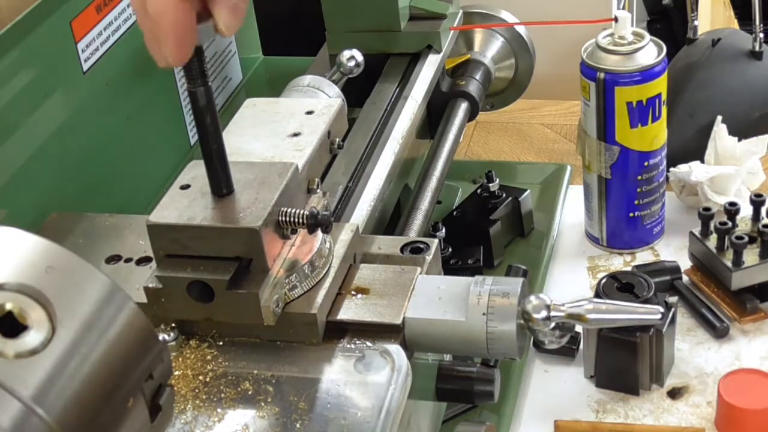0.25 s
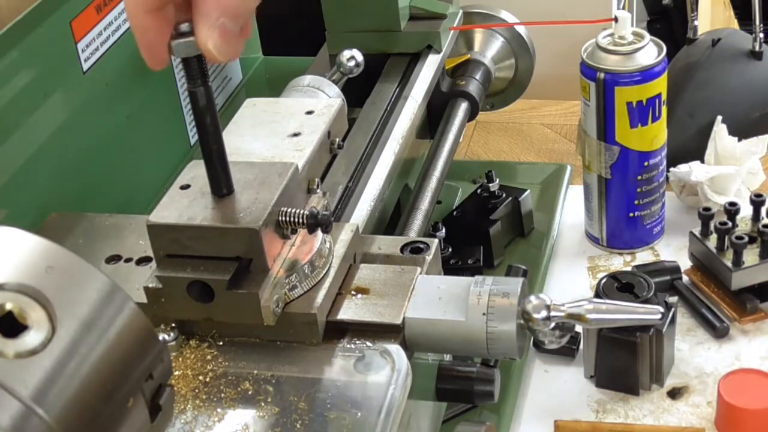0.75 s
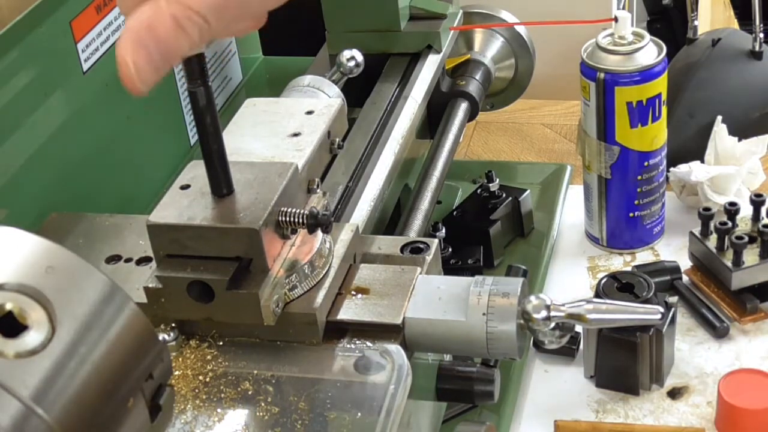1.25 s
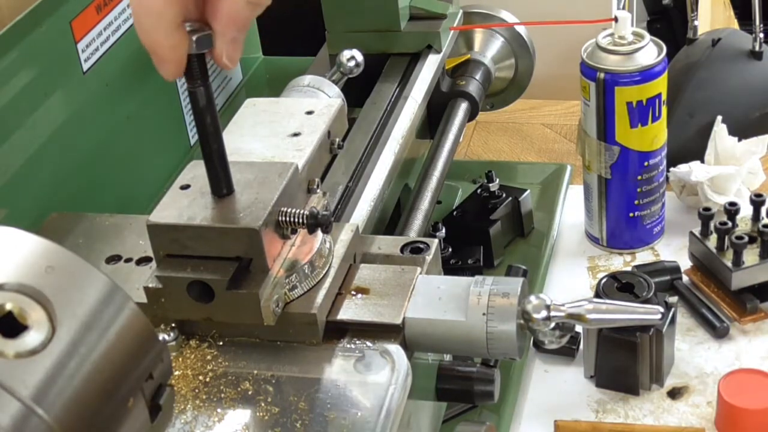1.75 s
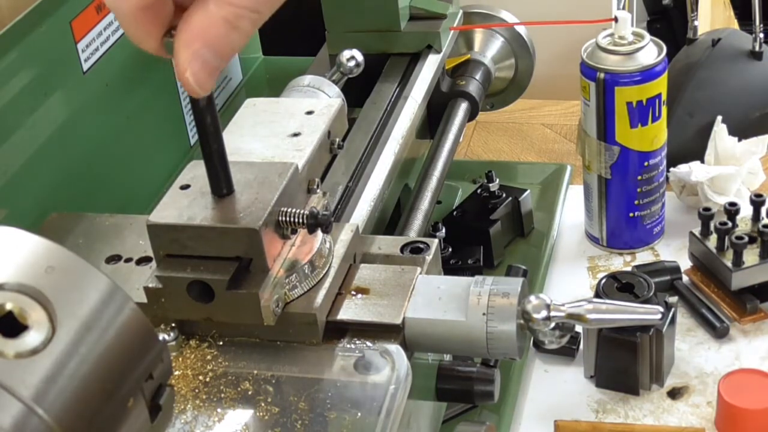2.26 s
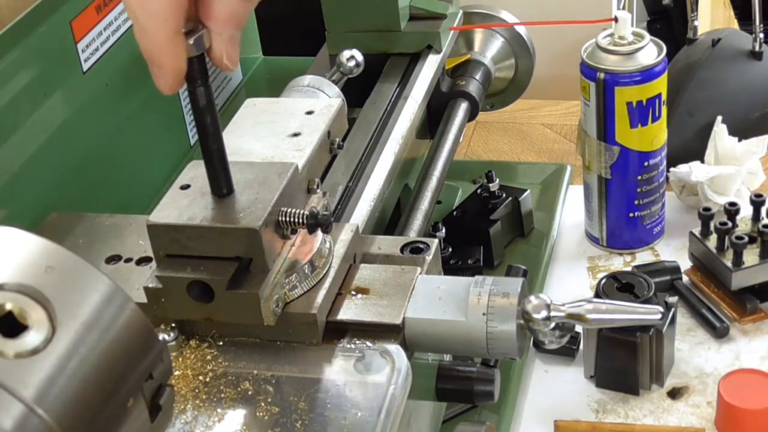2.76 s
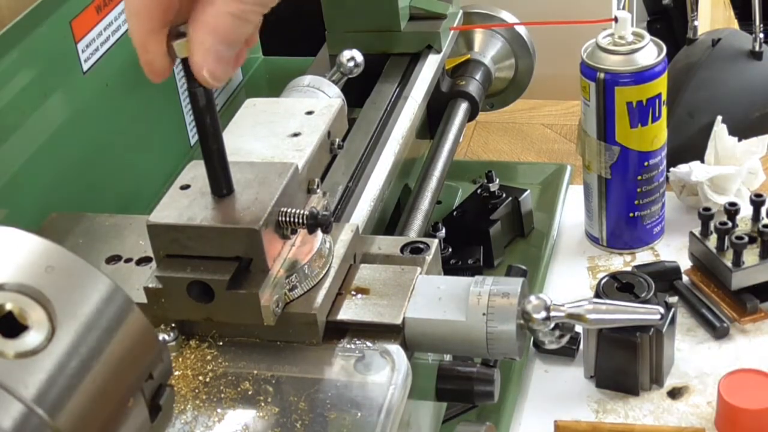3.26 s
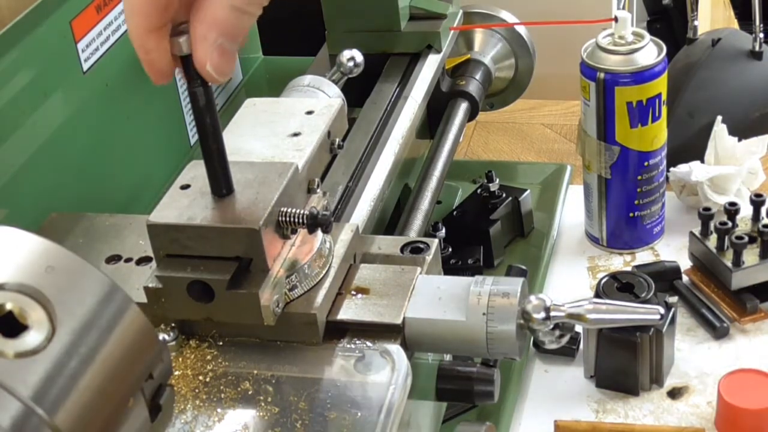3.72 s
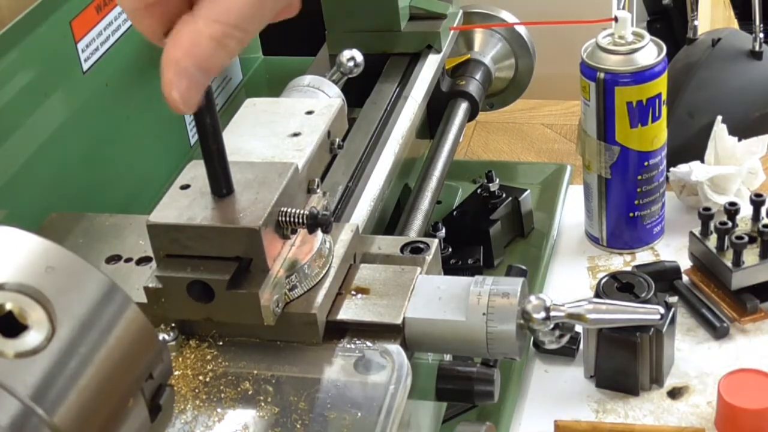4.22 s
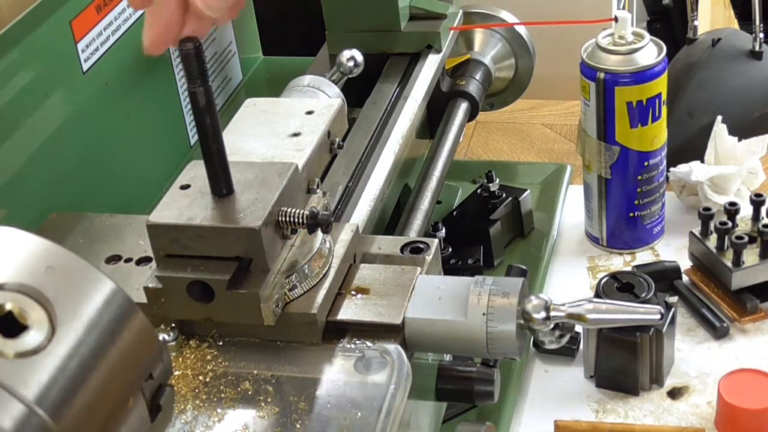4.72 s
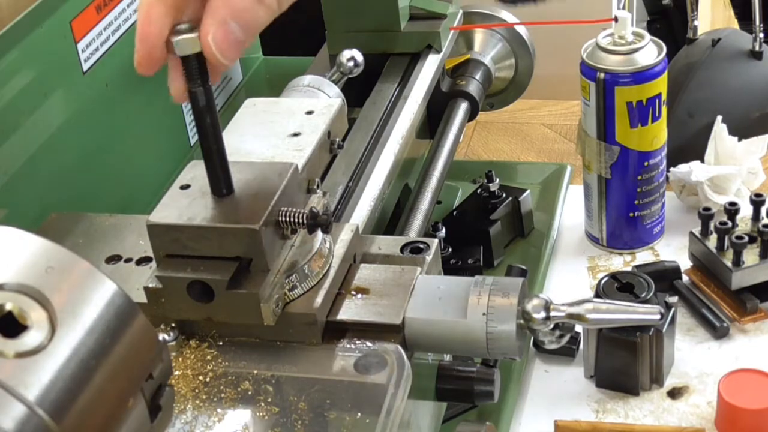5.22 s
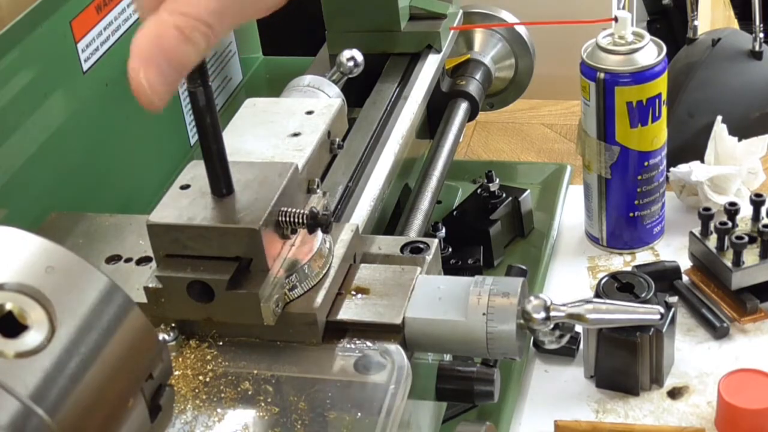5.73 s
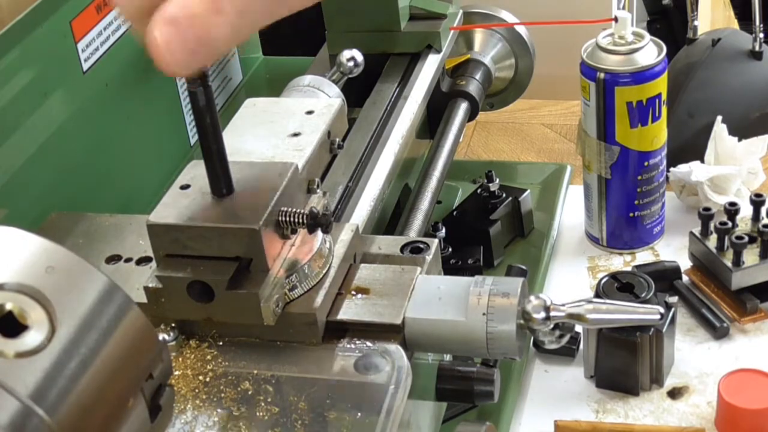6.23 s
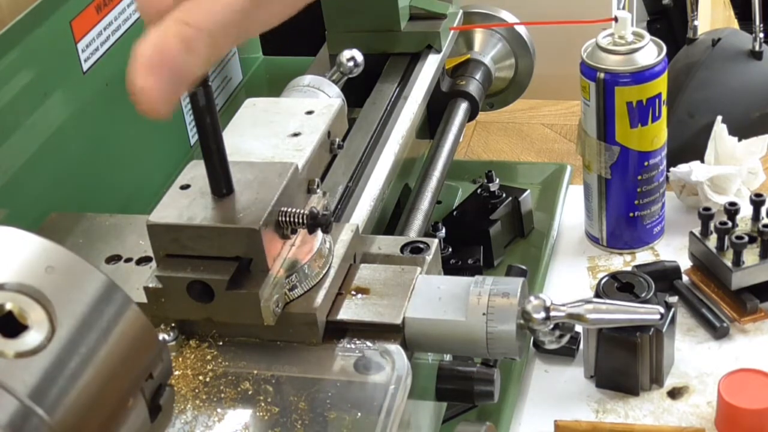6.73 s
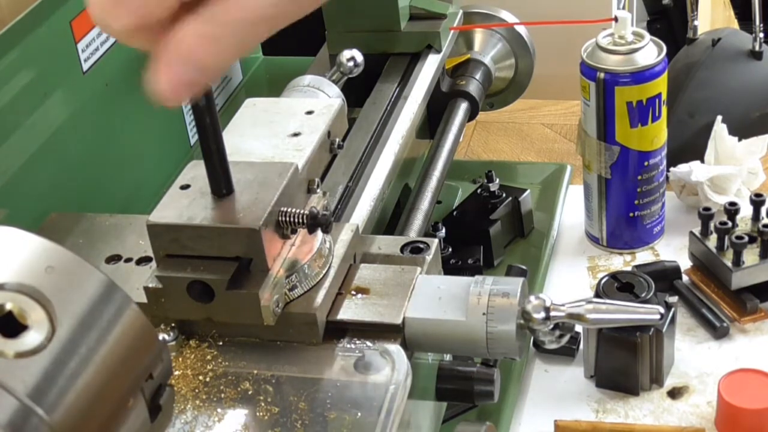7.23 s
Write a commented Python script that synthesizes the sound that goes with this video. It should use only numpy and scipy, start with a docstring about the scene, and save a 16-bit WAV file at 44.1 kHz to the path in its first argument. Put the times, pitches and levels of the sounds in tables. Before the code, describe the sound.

A steel nut is started by hand on a threaded stud in a heavy machine slide. A sharp bright click opens, followed by short dull grinding twists, small thread knocks and sparse ticks. Fingers brush softly and bump the work in the middle. A tight cluster of clicks comes near five seconds, then longer, grittier turns. Close stereo microphone, small workshop, short tail, faint low air and hiss.

```python
"""Nut started by hand on a lathe stud

A steel nut is started on a threaded stud in the slide of a small lathe, in a home workshop.
Its clicks on the stud are short noise bursts through steel resonances. Its short grinding turns are random
grains through the dull modes of the slide, with catches and slips of the thread as single struck knocks.
Fingers swish as coloured noise, soft thumps swing the bench resonances, the hand stirs a low murmur,
the bed hums on once as decaying sines, and the room hisses faintly as steady noise."""
import sys
import numpy as np
from scipy import signal
from scipy.fft import rfft, irfft, next_fast_len
from scipy.io import wavfile
from scipy.ndimage import uniform_filter1d

SR = 44100
rng = np.random.default_rng(int(sys.argv[2]) if len(sys.argv) > 2 else 0)


def output_pcm(signal):
    """Save a mono or channel-first signal as 16-bit PCM at the path in sys.argv[1].

    Samples are clipped to [-1, 1] before scaling.
    """
    pcm = np.clip(np.atleast_2d(signal).T, -1, 1) * 32767
    wavfile.write(sys.argv[1], SR, np.round(pcm).astype(np.int16))


N = 329868
TIME = np.arange(N) / SR


def from_db(db):
    """Decibels to gain."""
    return 10 ** (np.asarray(db) / 20)


def rms_one(x):
    """Scale to rms 1."""
    return x / np.sqrt(np.mean(x ** 2) + 1e-20)


def at_hz(points, hz):
    """Interpolate a table on a log-frequency axis."""
    table_hz, value = np.transpose(points)
    return np.interp(np.log(hz + 1), np.log(table_hz), value)


def colour(x, spectrum):
    """Give a steady noise a spectrum; rms 1."""
    size = next_fast_len(N)
    gain = from_db(at_hz(spectrum, np.fft.rfftfreq(size, 1 / SR)))
    return rms_one(irfft(rfft(x, size) * gain, size)[..., :N])


def soften(x, hz):
    """A contact of finite length holds little above a corner frequency."""
    return signal.sosfilt(signal.butter(4, hz, fs=SR, output="sos"), x)


def thin(x, hz):
    """Reduce the bass below a corner frequency."""
    return signal.sosfilt(signal.butter(2, hz, "high", fs=SR, output="sos"), x)


def resonate(x, hz, width_hz):
    """One two-pole resonance, gain about 1 on top."""
    r = np.exp(-np.pi * width_hz / SR)
    numerator = np.array([1, 0, -1]) * (1 - r * r) / 2
    denominator = [1, -2 * r * np.cos(2 * np.pi * hz / SR), r * r]
    return signal.lfilter(numerator, denominator, x + 1e-18)


def body(x, modes):
    """Resonances in parallel, alternating in sign."""
    return sum((-1) ** k * from_db(db) * resonate(x, hz, width_hz)
               for k, (hz, width_hz, db) in enumerate(modes))


def pan(x, left_right_db):
    """Place a sound by its left minus right level."""
    return x * from_db(np.array([[left_right_db], [-left_right_db]]) / 2)


def add(track, start_s, sound):
    """Mix a sound in at a time."""
    i = int(start_s * SR)
    track[..., i:i + sound.shape[-1]] += sound[..., :N - i]


def contact(decay_s):
    """A touch is a quickly fading burst of tiny collisions."""
    t = TIME[:SR // 5]
    return rng.choice([-1, 1], len(t)) * np.exp(-t / decay_s)


def grains(per_s, spread_db):
    """Rough spots catch at random, with uneven force; rms 1."""
    sizes = from_db(spread_db * np.minimum(rng.exponential(1, N), 4))
    return rms_one(sizes * rng.choice([-1, 1], N) * (rng.random(N) < per_s / SR))


# Fingers turn the nut. Each row: start in seconds, length in seconds, relative grinding level in dB,
# grinding centre at top speed in Hz, relative rasp level at top speed in dB.
TURNS = [(0.308, 0.073, -48.5, 780, -59.5), (0.415, 0.037, -45.5, 790, -66),
         (0.492, 0.031, -42, 660, -49.5), (0.619, 0.015, -45.5, 790, -62),
         (0.892, 0.016, -44.5, 770, -59.5), (1.046, 0.04, -56, 740, -75), (1.111, 0.051, -48.5, 700, -66),
         (1.606, 0.027, -53.5, 696, -64), (1.625, 0.054, -48, 734, -71.5),
         (1.713, 0.087, -55.5, 684, -70.5), (1.938, 0.059, -45.5, 696, -59.5),
         (2.041, 0.095, -55.5, 830, -69), (2.436, 0.041, -50, 810, -61.5), (2.505, 0.031, -53, 930, -52.5),
         (2.829, 0.051, -58.5, 1000, -57.5), (3.352, 0.019, -47, 650, -66.5),
         (3.646, 0.014, -50.5, 756, -63), (4.39, 0.11, -56, 700, -70.5), (4.505, 0.031, -42, 790, -55.5),
         (5.027, 0.099, -41.5, 830, -53), (5.511, 0.15, -56, 674, -68), (5.665, 0.11, -54.5, 720, -67),
         (6.012, 0.089, -51.5, 666, -64.5), (6.106, 0.12, -47.5, 750, -57.5), (6.38, .13, -48.5, 780, -57),
         (6.682, 0.098, -48, 770, -57.5), (6.948, 0.042, -56, 764, -63.5), (7.001, 0.056, -49.5, 820, -56),
         (7.242, 0.11, -48.5, 770, -58.5)]
GRIP_S, RELEASE_DB_PER_S = 0.0039, 444
START_SPEED = 0.33   # share of top speed at the start and end of a turn
GRIND_SPEED_DB, RASP_SPEED_DB, SPEED_OCTAVES = 4, 8.5, 0.17   # rise from standstill to top speed
CREEP_HZ = 700


def turning():
    """A turn grips, speeds up, slows, lets go; speed lifts the rasp strongly, the grinding and its pitch a little."""
    grind, rasp, pitch_sum = np.zeros(N), np.zeros(N), np.zeros(N)
    t = TIME[:SR // 2]
    for start_s, length_s, grind_db, hz, rasp_db in TURNS:
        release = from_db(-RELEASE_DB_PER_S * np.maximum(t - length_s, 0))
        grip = np.minimum(t / GRIP_S, 1) * release
        speed = START_SPEED + (1 - START_SPEED) * np.sin(np.pi * np.minimum(t / length_s, 1))
        gain = grip * from_db(grind_db + GRIND_SPEED_DB * (speed - 1.5))
        add(grind, start_s, gain)
        add(pitch_sum, start_s, gain * hz * 2 ** (SPEED_OCTAVES * (speed - 1)))
        add(rasp, start_s, grip * from_db(rasp_db + RASP_SPEED_DB * (speed - 1)))
    centre_hz = (pitch_sum + 1e-12 * CREEP_HZ) / (grind + 1e-12)   # gain-weighted where turns overlap
    return grind, centre_hz, rasp


# Modes of slide and tool block. Each row: frequency in Hz, width in Hz, relative level in dB.
SLIDE = [(209,18,-6.5),(304,60,-11.5),(427,54,-5),(526.3,15.3,0),(583,31.4,-2.5),(680.2,15.2,2.5),(750,85,-5),(840,82,-2),(963,40,-16),(989,18,1.5),(1000,160,-8.5),(1156,68,-4.5),(1260,156,-14.5),(1513.4,58,-8.5),(2084,106,-14.5),(2330,600,-24.5)]


def slide(force, centre_hz, focus_db):
    """The slide rings in all its modes; the grip favours those near a centre frequency."""
    out = 0
    for k, (hz, width_hz, db) in enumerate(SLIDE):
        near = 1 / (1 + (np.log2(hz / centre_hz) / 0.34) ** 2)
        out = out + (-1) ** k * from_db(db + focus_db * near) * resonate(force, hz, width_hz)
    return out


def grinding(gain, centre_hz):
    """Thread flanks rub and shake the slide, whose swell lags the force slightly."""
    ringing = slide(grains(per_s=900, spread_db=3.0), centre_hz, focus_db=12.5)
    ringing /= np.sqrt(uniform_filter1d(ringing ** 2, size=1100) + 1e-12)   # steady finger pressure
    r = np.exp(-1 / (0.00043 * SR))
    return from_db(1.0) * signal.lfilter([1 - r], [1, -r], gain) * ringing


def stick_slip(depth_db, grip_s):
    """The thread grips and frees itself, so smoothed noise flutters the friction at random; rms 1."""
    r = np.exp(-1 / (grip_s * SR))
    wander = rms_one(signal.lfilter([1], [1, -2 * r, r * r], rng.standard_normal(N)))
    return rms_one(from_db(depth_db * np.tanh(wander)))


def burrs(grind, centre_hz):
    """Burrs catch at random while the nut turns, each a gritty tick in the slide."""
    ticks = slide(grains(per_s=63, spread_db=3.5), centre_hz, focus_db=5.0)
    return from_db(-7.5) * grind * rms_one(ticks)


# The thread catches and slips. Each row: time in seconds, relative peak in dB, centre in Hz.
SLIPS = [(0.364, -26, 585), (0.498, -40.5, 553), (0.803, -41.5, 610), (0.903, -38, 720), (1.117, -32, 580),
         (2.085, -36, 840), (2.447, -35, 730), (2.612, -36.5, 750), (3.036, -35.5, 606), (3.931, -33, 677),
         (4.413, -34.5, 800), (4.531, -24, 910), (5.088, -27, 720), (5.23, -36.5, 700), (5.301, -39.5, 720),
         (5.404, -41.5, 756), (5.528, -36, 680), (5.622, -31, 720), (5.653, -31, 710), (5.763, -26.5, 712),
         (5.981, -34, 790), (6.019, -29, 646), (6.373, -31, 680), (6.682, -29, 690)]


def slips():
    """The thread lets go with a short knock that swells in the slide for a few milliseconds."""
    out = np.zeros(N)
    impulse = 1.0 * (TIME[:SR // 8] == 0)
    for time_s, db, hz in SLIPS:
        knock = slide(resonate(impulse, hz, width_hz=216), hz, focus_db=11.0)
        add(out, time_s - 0.003, from_db(db - 7.5) * knock / np.abs(knock).max())   # starts ahead to swell
    return out


def creeping(weight):
    """Under a resting hand the nut creeps in tiny random slips that tick in the slide."""
    ticks = slide(grains(per_s=30, spread_db=2.5), CREEP_HZ, focus_db=7.0)
    return from_db(-10) * weight * rms_one(ticks)


# Rasp spectrum. Each row: frequency in Hz, relative density in dB per Hz.
RASP = [(1300,-8.5),(1700,-25),(2300,-11),(3000,-13),(4500,-5),(6000,-10.5),(7500,1),(9000,-3.5),(11000,-7),(13000,-11),(16000,-28)]


def rasping(rasp, flutter):
    """Bright friction grains follow the speed and flutter of the turning."""
    return from_db(1.0) * rasp * flutter * colour(grains(per_s=600, spread_db=2.5), RASP)


# Nut strikes stud. Each row: time in seconds, relative peak in dB, nut ring in Hz, stud over nut in dB,
# edges over nut in dB, left minus right in dB.
CLICKS = [(0.3115, -17.5, 7780, -13.5, 0, 1), (0.4383, -43.5, 6850, 1, -5, -1),
          (0.5105, -28, 6800, -10, -4, 1), (0.62, -40.5, 8240, -6.5, -4, 2), (0.8997, -47, 8000, -4, -8, 1),
          (1.95, -35.5, 9100, -7, -4, -1), (1.9792, -27.5, 8400, -5, -17, 0),
          (2.837, -46, 8600, -5, -3, -22), (3.2085, -44.5, 8610, -16, -12, -1),
          (3.346, -35.5, 8160, 9, 13.5, 3), (3.3573, -42, 7830, -26, -6, -1.5),
          (3.9254, -30.5, 7850, 7.5, 4, 0.5), (4.511, -45.5, 8000, -9, -12, -5),
          (4.531, -38.5, 6840, -20, -15, 4), (5.031, -20, 7480, -50, -2.5, 3),
          (5.042, -26, 7540, -29, -22, -9), (5.0571, -21, 8240, -37, -2.5, 2),
          (5.0827, -32.5, 7700, -11, -18, 0), (5.118, -34, 7040, -31, -18, 0),
          (5.758, -42, 7690, -25, -19, -2), (5.9781, -34, 7040, -11, -10, -4),
          (6.012, -45, 7750, -5, -8, -2), (6.1232, -39, 7960, -11, -11, -1),
          (6.3699, -19.5, 7020, -46, -6, -2.5)]
# Modes of stud, of nut and thread flanks, and of sharp edges in contact.
# Each row: frequency in Hz, width in Hz, relative level in dB.
STUD = [(2250,260,-10),(3450,600,-4),(4300,700,-2),(5100,700,0),(5700,600,-3)]
NUT = [(7040,640,-0.5),(7530,61,9),(7900,310,0),(7800,360,-21),(8460,150,-12),(8535,18,12.5),(9100,630,2.5)]
EDGE = [(9520,92,-16),(9580,1700,2.5),(11700,1560,-2),(11900,170,-40),(12700,2600,-15)]


def clicks():
    """Stud, nut and edges ring briefly; each new grip changes the nut's tone and its reflections."""
    out = np.zeros((2, N))
    for time_s, db, hz, stud_db, edge_db, left_right_db in CLICKS:
        touch = soften(contact(decay_s=0.00061), hz=11350)
        touch = thin(touch, hz=870)   # small parts radiate little bass
        nut = rms_one(body(touch, NUT)) + from_db(-3.5) * rms_one(resonate(touch, hz, width_hz=200))
        click = from_db(stud_db) * rms_one(body(touch, STUD)) + rms_one(nut)
        edges = from_db(edge_db) * rms_one(body(touch, EDGE))
        click = click + pan(edges, left_right_db=-6.5)
        attack_rms = np.std(click.mean(axis=0)[:SR // 500])
        click = pan(from_db(db - 9.5) * click / attack_rms, left_right_db)   # peak stands out of the attack
        add(out, time_s + 0.0005, workshop(click, wet_db=-0.5, likeness=0.48))
    return out


# Fingers slide on steel. Each row: middle in seconds, length (2 sigma) in seconds, relative level in dB.
SWISHES = [(1.319, 0.08, -59.5), (1.734, 0.014, -61), (2.075, 0.3, -69), (2.372, 0.096, -70.5),
           (2.545, 0.064, -59), (2.87, 0.55, -69), (3.029, 0.05, -66), (3.21, 0.13, -68.5),
           (5.84, 0.2, -69), (7.35, 0.25, -68.5)]
# Skin spectrum. Each row: frequency in Hz, relative density in dB per Hz.
SKIN = [(2000,-14),(5000,-9),(7000,-5),(8500,0.5),(10500,1),(12500,-7.5),(16000,-14)]


def fingers():
    """Skin slides over steel in soft bright swells."""
    swell = sum(from_db(db) * np.exp(-2 * ((TIME - middle_s) / length_s) ** 2)
                for middle_s, length_s, db in SWISHES)
    return from_db(0.5) * swell * colour(grains(per_s=9000, spread_db=3.5), SKIN)


# The hand rests on the work. Each row: start of hold in seconds, end of hold in seconds, relative level in dB.
RESTS = [(0.5, 1.318, -59), (2.423, 3.19, -63), (3.683, 4.676, -59), (5.192, 6.545, -68),
         (7.128, 7.48, -59)]
REST_FADE_DB_PER_S = 115


def resting():
    """Weight of the hand on the work, as a gain: it settles, holds and lifts."""
    return sum(from_db(db - REST_FADE_DB_PER_S * np.abs(TIME - np.clip(TIME, start_s, end_s)))
               for start_s, end_s, db in RESTS)


# Murmur spectrum of the stirred machine. Each row: frequency in Hz, relative density in dB per Hz.
HANDLING = [(40,-33),(100,-5),(160,-14),(215,2),(300,-4.5),(390,3),(460,-5),(520,-4),(750,-7),(1100,-17),(1600,-26),(3000,-26.5),(8000,-29)]
# Bench modes. Each row: frequency in Hz, width in Hz, relative level in dB.
BENCH = [(220,25,3.5),(264,16,-2),(350,45,-3),(412,50,3),(90,50,-11.5)]
THREAD_BITES_S = 5.5   # from here on the nut sits in the thread
LOOSE_SHAKE_DB, SEATED_SHAKE_DB = -23, -10.5   # bench shake relative to the grinding gain


def handling(grind, weight):
    """The hand stirs a low murmur; turns also shake the bench, more once the thread has bitten."""
    murmur = from_db(-3.5) * weight * colour(grains(per_s=900, spread_db=2.0), HANDLING)
    shake = from_db(np.where(TIME < THREAD_BITES_S, LOOSE_SHAKE_DB, SEATED_SHAKE_DB))
    return murmur + shake * grind * rms_one(body(grains(per_s=800, spread_db=2.0), BENCH))


# Fingers knock the work. Each row: time in seconds, relative bench peak in dB, bench swing in Hz,
# tap over bench in dB, tap in Hz.
THUMPS = [(2.083, -40.5, 354, -6, 860), (2.834, -45.5, 268, 2.5, 1250), (2.901, -33.5, 247, -17, 980),
          (3.036, -34, 246, -6, 706), (3.367, -41.5, 236, -0.5, 525), (5.987, -46.5, 340, 8.5, 427),
          (6.372, -43.5, 350, 6, 515)]


def thumps():
    """A soft tap with a brief scuff swings the bench for a few cycles; a wall returns it once."""
    out, t = np.zeros(N), TIME[:SR // 5]
    for time_s, db, hz, tap_db, tap_hz in THUMPS:
        push = np.exp(-t / 0.00021) - np.exp(-t / 0.00037)
        swing = resonate(push, hz, width_hz=36) + from_db(-11.5) * body(push, BENCH)
        tap = resonate(soften(contact(decay_s=0.0074), hz=5140), tap_hz, width_hz=184)
        thump = swing / np.abs(swing).max() + from_db(tap_db) * tap / np.abs(tap).max()
        thump = from_db(db) * thump
        add(out, time_s + 0.0029, thump)
        add(out, time_s + 0.028, from_db(-9.5) * thump)
    return out


# Lathe bed modes. Each row: frequency in Hz, relative starting level in dB, T60 in seconds.
BED = [(209,-55.5,0.96),(515,-53.5,0.93),(410,-71,0.35)]
BED_PUSH_S = 3.365


def bed():
    """The heavy casting hums on faintly after one firm push."""
    out, t = np.zeros(N), TIME[:SR]
    hum = sum(from_db(db - 60 * t / t60_s) * np.sin(2 * np.pi * hz * t) for hz, db, t60_s in BED)
    add(out, BED_PUSH_S, hum)
    return out


# Decay of the workshop. Each row: frequency in Hz, T60 in seconds (before the near-reflection boost).
ROOM_T60 = [(150,0.28),(700,0.12),(2500,0.15),(8000,0.078),(15000,0.022)]


def workshop(x, wet_db, likeness):
    """Close machine surfaces and walls return a dense short tail, partly alike at left and right."""
    t, tail = TIME[:SR // 4], 0
    edges_hz = np.geomspace(80, 18000, 6)
    for low, high in zip(edges_hz, edges_hz[1:]):
        band = signal.butter(2, [low, high], "band", fs=SR, output="sos")
        mid, side = signal.sosfilt(band, rng.standard_normal((2, len(t))))
        both = np.sqrt(1 + likeness) * mid + np.sqrt(1 - likeness) * side * [[1], [-1]]
        tail = tail + both * np.exp(-np.log(1000) * t / at_hz(ROOM_T60, np.sqrt(low * high)))
    near = 1 + 1.3 * np.exp(-t / 0.0033)   # the lathe itself reflects first and strongest
    tail = rms_one(tail * near * (t > 0.002)) / np.sqrt(len(t))
    return x + from_db(wet_db) * signal.fftconvolve(x, tail, axes=1)[:, :x.shape[1]]


# Room spectrum. Each row: frequency in Hz, relative density in dB per Hz.
FLOOR = [(20,-26),(45,-13),(90,-3),(160,-3),(260,0),(520,-5),(800,-10),(1550,-13),(1800,-21),(2100,-14),(2700,-22),(6000,-23),(8500,-17),(11500,-16),(16000,-24)]
# Spectral tilt of the side signal. Each row: frequency in Hz, side minus mid in dB before levelling.
FLOOR_SIDE = [(60,-2.5),(200,-0.5),(1400,3.5),(3000,-3),(7000,6.5),(12000,-45)]
FLOOR_DB = -64.5   # rms of the mid signal


def room_tone():
    """A diffuse low murmur of air and a thin hiss, centred at the very top."""
    side_spectrum = [(hz, db + at_hz(FLOOR_SIDE, hz)) for hz, db in FLOOR]
    mid = colour(rng.standard_normal(N), FLOOR)
    side = colour(rng.standard_normal(N), side_spectrum)
    return from_db(FLOOR_DB) * (mid + from_db(-1.5) * side * [[1], [-1]])


def scene():
    """The slide sounds a little to the left, the fine sounds near the middle."""
    grind, centre_hz, rasp = turning()
    weight = resting()
    flutter = stick_slip(depth_db=4.5, grip_s=0.002)
    thread = grinding(grind, centre_hz) * flutter + burrs(grind, centre_hz) + slips() + creeping(weight)
    dull = pan(thread, left_right_db=4.5) + pan(handling(grind, weight), left_right_db=-2.5)
    bright = pan(rasping(rasp, flutter), left_right_db=-1.0) + pan(fingers(), left_right_db=-0.5)
    low = pan(thumps() + bed(), left_right_db=-0.5)
    mix = clicks() + workshop(dull, wet_db=-5.0, likeness=0.66)
    mix += workshop(bright, wet_db=-1.0, likeness=0.81)
    mix += workshop(low, wet_db=-11.5, likeness=0.4)
    return mix + room_tone()


CUTOFF_HZ = 15650


def record(dry):
    """The small microphones lose the deepest bass; the top is cut steeply, without phase shift."""
    top_cut = signal.ellip(10, 0.05, 70, CUTOFF_HZ, fs=SR, output="sos")
    return signal.sosfiltfilt(top_cut, thin(dry, hz=38))


dry = scene()
out = record(dry)
output_pcm(out)
```